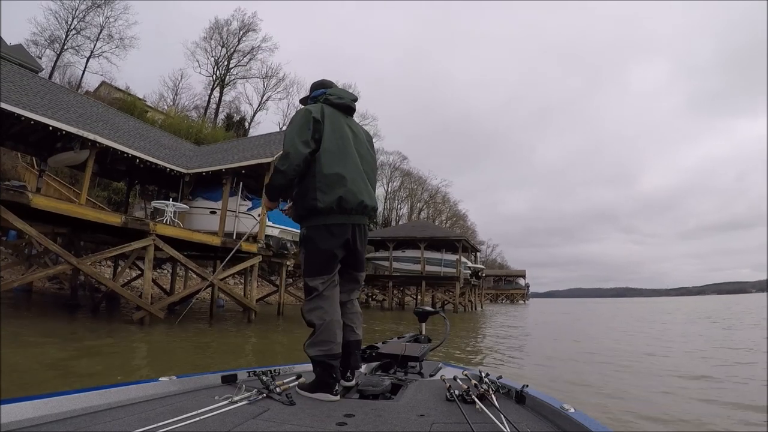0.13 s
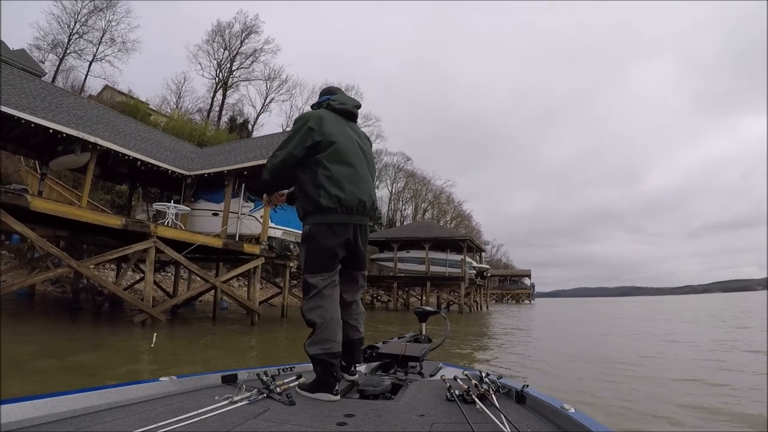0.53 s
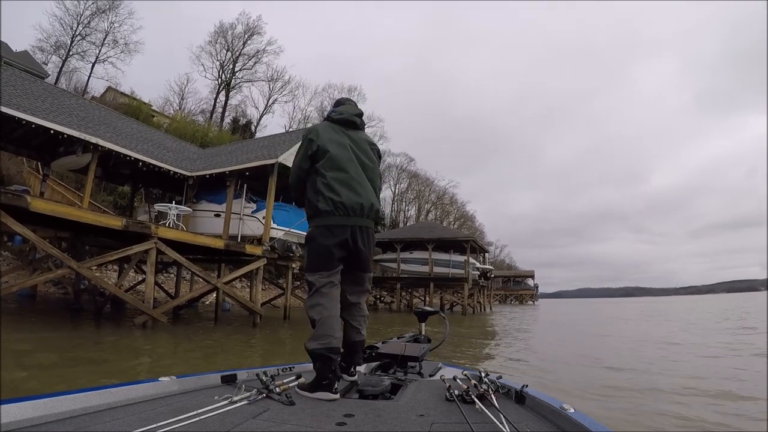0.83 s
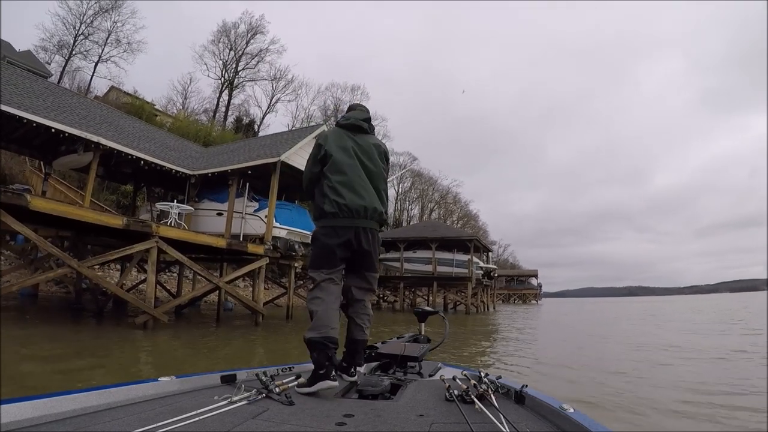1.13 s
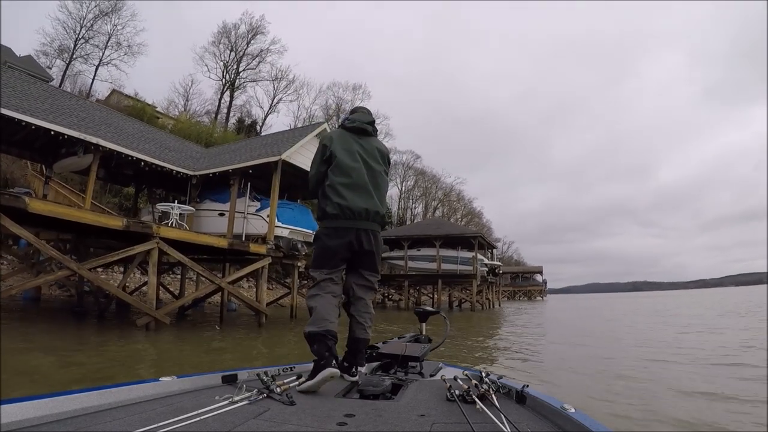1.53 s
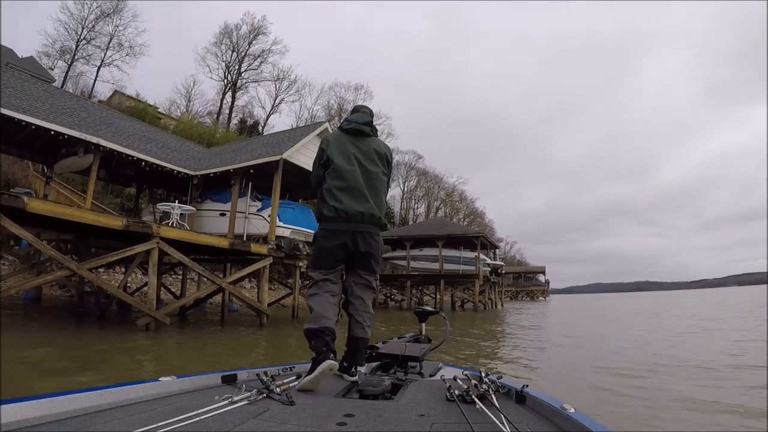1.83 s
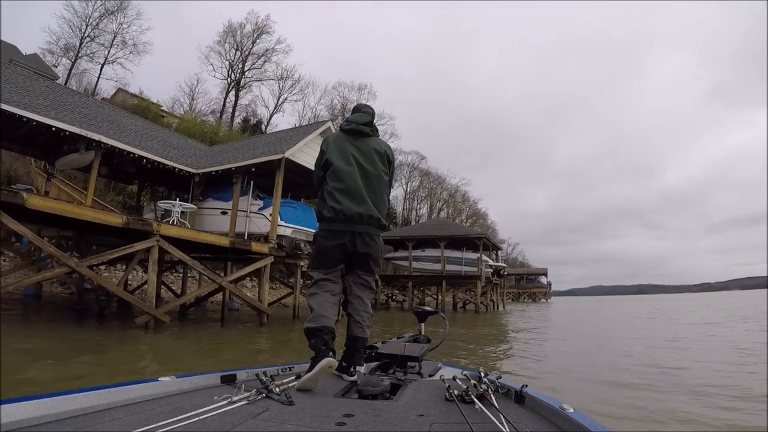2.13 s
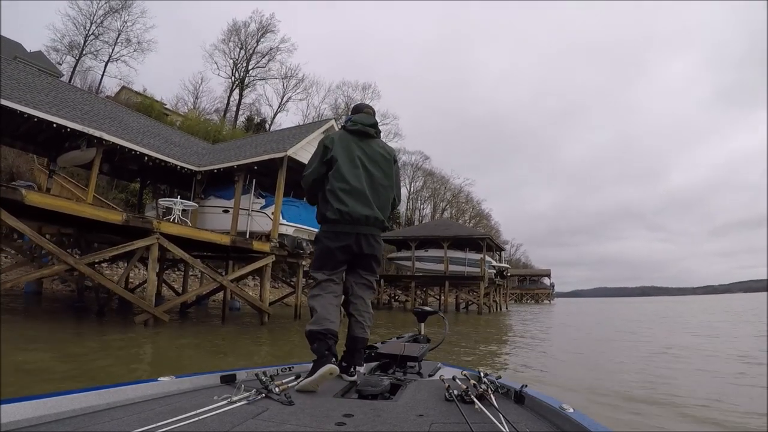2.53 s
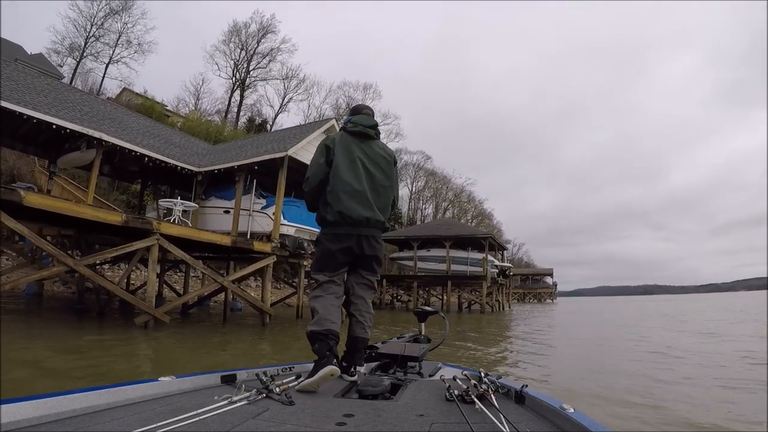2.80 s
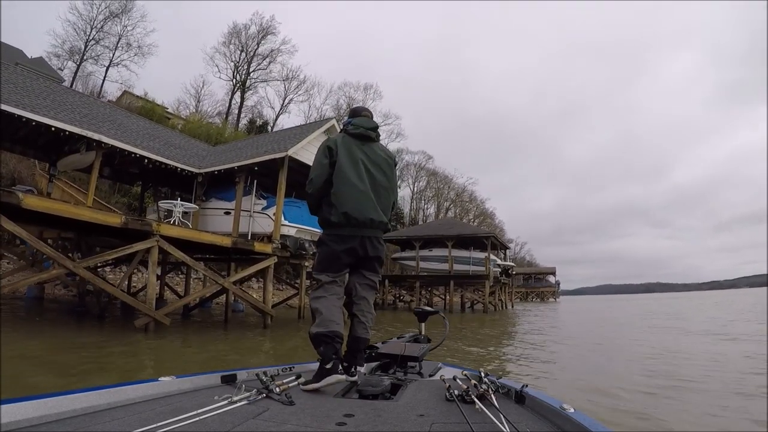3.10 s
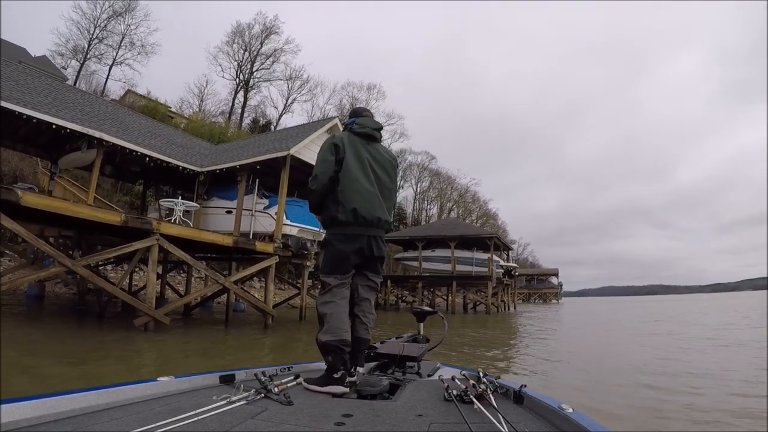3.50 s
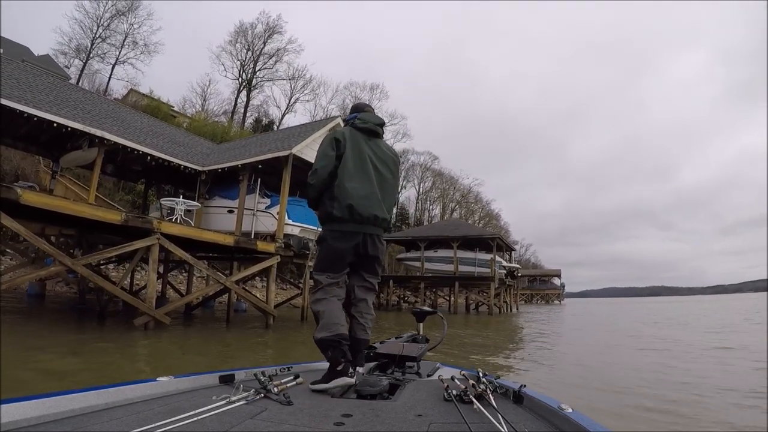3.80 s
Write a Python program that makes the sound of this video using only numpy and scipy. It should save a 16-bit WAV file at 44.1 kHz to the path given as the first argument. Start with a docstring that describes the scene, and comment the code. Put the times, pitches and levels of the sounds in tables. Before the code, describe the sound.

Outdoors on a fishing boat, waves knock and gurgle under the hull, moderate at first, then two heavy slaps near the end; low wind buffets the deck-mounted stereo microphone, with small clicks and distant bird calls.

```python
"""Choppy lake water slaps the hull of a small fishing boat: each wave is noise for the splash, fading tones
for the hollow boom and rising tones for trapped air. The boom shakes the deck camera, so its two microphones
swing in opposition. Tackle clicks (ringing noise), drops plink and far birds call (blurred tones).
Wind buffets the microphones over a soft hiss (shaped noise), and the biggest slaps push the camera's gain down."""
import sys
import numpy as np
from scipy.fft import rfft, irfft, next_fast_len
from scipy.io import wavfile
from scipy.ndimage import uniform_filter1d, minimum_filter1d, map_coordinates

SR = 44100
rng = np.random.default_rng(int(sys.argv[2]) if len(sys.argv) > 2 else 0)


def generate_wav(signal):
    """Clip the signal to [-1, 1] and save it as 16-bit WAV at the path in sys.argv[1]."""
    frames = np.transpose(np.atleast_2d(signal))
    scaled = np.clip(frames, -1, 1) * 32767
    pcm = np.round(scaled).astype(np.int16)
    wavfile.write(sys.argv[1], SR, pcm)


N = 174195  # length in samples


def amp(db):
    """Turn decibels into gain."""
    return 10 ** (np.asarray(db) / 20)


def unit(x):
    """Scale to rms 1."""
    return x / np.sqrt(np.mean(x ** 2) + 1e-20)


def along(points, hz):
    """Read a curve of (pitch_hz, value) points on a log pitch axis."""
    f, v = np.transpose(points)
    return np.interp(np.log(hz + 1), np.log(f + 1), v)


def curve(rows):
    """Join (time_s, value) points into one value per sample."""
    return np.interp(np.arange(N) / SR, *np.transpose(rows))


def wobble(rate, size=N):
    """Draw a smooth random curve with rate knots a second."""
    return map_coordinates(rng.standard_normal(2048), [np.arange(size) * rate / SR], mode="wrap")


def filtered(x, response):
    """Filter x by a gain that depends on frequency."""
    n = x.shape[-1]
    m = next_fast_len(n + SR // 4)
    spectrum = rfft(x, m) * response(np.fft.rfftfreq(m, 1 / SR))
    return irfft(spectrum, m)[..., :n]


def rush(gain, alike, size=N):
    """Make stereo noise of rms 1 with a given colour and left-right likeness."""
    def mid_side(hz):
        turn = np.arccos(np.clip(along(alike, hz), -.98, .98)) / 2
        return gain(hz) * np.array([np.cos(turn), np.sin(turn)])

    mid, side = filtered(rng.standard_normal((2, size)), mid_side)
    return unit(np.array([mid + side, mid - side]))


def colour(points):
    """Turn (pitch_hz, level_db) points into a gain of frequency."""
    return lambda hz: amp(along(points, hz))


def hump(hz, centre, slope_db):
    """A rounded peak whose skirts fall by slope_db an octave."""
    return amp(-slope_db * np.hypot(np.log2((hz + 1) / centre), .5))


def add(out, s, x):
    """Mix x into out at time s."""
    i = int(np.clip(round(s * SR), 0, N - 1))
    out[..., i:i + x.shape[-1]] += x[..., :N - i]


def add_wash(out, s, db, rise, fall, gain, alike, grain_db):
    """Mix in grainy noise that swells to a rounded crest near s and dies away."""
    t = np.arange(-.1, .25, 1 / SR)
    level = 2 * amp(db) * np.exp(-np.logaddexp(-t / rise, t / fall))
    grain = unit(amp(grain_db * wobble(400.4, size=len(t))))
    add(out, s + t[0], level * grain * rush(gain, alike, size=len(t)))


def bubble(hz, life, rise):
    """A damped tone that rises as the bubble nears the surface."""
    u = np.arange(int(1.4 * life * SR)) / SR / life
    tone = np.sin(2 * np.pi * hz * life * (u + rise * u ** 2 / 2))
    return tone * (1 - np.exp(-12 * u)) * amp(7.0 - 46.7 * u)


# strength of the gusts, before the overall lift: time_s, level_db
GUSTS = [(0.0, -27.5), (0.76, -25), (0.8, -32), (1.29, -25), (1.34, -28.5), (1.46, -18.5), (1.58, -23),
         (1.68, -20), (1.74, -26), (2.16, -25.5), (2.22, -28), (2.54, -17.5), (2.6, -26), (2.67, -24),
         (2.77, -26.5), (3.57, -24), (3.83, -20), (3.95, -19.5)]
# colour of the rumble: pitch_hz, level_db
RUMBLE_COLOUR = [(8, 6), (25, 3), (50, 0), (85, 1.5), (120, -8), (180, -20), (300, -28), (600, -77),
                 (2000, -96)]
# how alike the rumble is left and right: pitch_hz, likeness (1 = same)
RUMBLE_LIKENESS = [(30, 0.86), (100, 0.42), (400, 0.12)]
WIND_LIFT_DB, WIND_FLUTTER_DB = 3.5, 0.4


def wind():
    """Gusts press on the microphones and make a low, fluttering rumble."""
    level_db = WIND_LIFT_DB + curve(GUSTS) + WIND_FLUTTER_DB * wobble(14)
    return amp(level_db) * rush(colour(RUMBLE_COLOUR), RUMBLE_LIKENESS)


# slow rise and fall of the wash, before its random flutter: time_s, level_db
WASH_LEVEL = [(0, -49), (.55, -49), (1.1, -47), (1.5, -46), (2.1, -48.5), (2.6, -46), (2.85, -44),
              (3.15, -47.5), (3.45, -46.5), (3.7, -48.5), (3.95, -45)]
# colour of the wash: pitch_hz, level_db
WASH_COLOUR = [(240, 2), (400, 7), (509, 0), (679, 2.5), (1100, -0.5), (1300, -1.5), (1660, -2.5),
               (2350, -4), (2900, -11.5), (3580, -8), (4500, -12), (7520, -10), (10800, -20.5),
               (13400, -35), (14800, -30)]
# how the high hiss comes and goes, before its random flutter: time_s, level_db
HISS_LEVEL = [(0, -58.5), (.36, -52), (.7, -56), (1.18, -63.5), (1.36, -47), (1.6, -60), (2.2, -59),
              (2.6, -66), (3, -61.5), (3.95, -65)]
# colour of the high hiss: pitch_hz, level_db
HISS_COLOUR = [(1000, 8), (3500, -1.5), (7000, 2.5), (10000, -5.5), (13500, -13), (15000, -43)]
# how alike left and right are, also for the tackle's clicks: pitch_hz, likeness (1 = same)
AIR_LIKENESS = [(400, 0.019), (1200, 0.043), (2200, 0.17), (3800, 0.72), (5200, 0.039), (8000, 0.033),
                (12000, 0.12)]
# balance of wash and hiss: pitch_hz, left_over_right_db
LEFT_OVER_RIGHT = [(400, -0.5), (2500, 0.5), (4000, 0.5), (6000, 5), (8300, -6), (10500, -6), (13000, 1)]


def air():
    """Breeze and open water make a broad wash, with a high hiss that comes and goes."""
    wash_gain = amp(curve(WASH_LEVEL) + 1.9 * wobble(6.71))
    wash = wash_gain * rush(colour(WASH_COLOUR), AIR_LIKENESS)
    hiss_gain = amp(curve(HISS_LEVEL) + 1.2 * wobble(24.5))
    hiss = hiss_gain * rush(colour(HISS_COLOUR), AIR_LIKENESS)
    return filtered(wash + hiss, lambda hz: amp(np.outer([.5, -.5], along(LEFT_OVER_RIGHT, hz))))


RIPPLES_PER_S, RIPPLE_MIDDLE_HZ, RIPPLE_MIDDLE_DB = 150, 1240, -66.5
RIPPLE_CYCLES = 3.7  # life of each bubble, in cycles of its tone


def ripples():
    """Many tiny bubbles along the waterline ring briefly at random moments, pitches and sides."""
    out = np.zeros((2, N))
    count = int(RIPPLES_PER_S * N / SR)
    for s, (pitch, size, pan) in zip(rng.uniform(0, N / SR, count), rng.standard_normal((count, 3))):
        hz = RIPPLE_MIDDLE_HZ * np.exp(.5 * pitch)
        level_db = RIPPLE_MIDDLE_DB + 2.4 * size + np.array([[2], [-2]]) * pan
        add(out, s, amp(level_db) * bubble(hz, RIPPLE_CYCLES / hz, 0.2))
    return out


# spray pattering back on the water: peak_s, rise_s, fall_s, centre_hz, level_db
PATTERS = [(0.124, 0.0061, 0.0051, 1700, -52), (0.539, 0.0034, 0.021, 1050, -49),
           (0.655, 0.0047, 0.011, 1120, -41), (1.37, .025, 0.017, 10000, -59),
           (2.195, 0.013, 0.0086, 1790, -52), (2.404, .008, 0.021, 1150, -46.5),
           (2.495, 0.022, 0.016, 2090, -54.5), (3.17, 0.043, 0.019, 2900, -48.5),
           (3.395, 0.0084, 0.01, 1960, -39.5), (3.70, 0.011, 0.013, 2440, -49)]
# how alike the spray is left and right: pitch_hz, likeness (1 = same)
SPRAY_LIKENESS = [(700, 0.22), (2000, 0.23), (6000, .3)]
SPRAY_GRAIN_DB, SPRAY_SLOPE_DB = 5.5, 15.5  # slope: per octave away from the centre


def spray():
    """Fine drops patter back on the water as short bursts of grainy noise."""
    out = np.zeros((2, N))
    for s, rise, fall, centre, db in PATTERS:
        tone = lambda hz: hump(hz, centre, SPRAY_SLOPE_DB)
        add_wash(out, s, db, rise, fall, tone, SPRAY_LIKENESS, SPRAY_GRAIN_DB)
    return out


# waves on the hull, shared by hull, air pockets, splashes and froth (levels are relative within each):
# start_s, boom_db, hollow_knock_db, splash_db, splash_rise_s, splash_fall_s, splash_centre_hz,
# trapped_air_hz, trapped_air_db
WAVES = [(0.136, -10, -21.5, -25, 0.0091, 0.027, 473, 405, -11.5),
         (0.215, -43, -28, -30, 0.016, .02, 400, 350, -25),
         (.345, -23.5, -37, -43, 0.012, 0.017, 650, 277, -40),
         (.428, -11, -31, -33.5, 0.016, 0.021, 505, 226, -29),
         (.545, -52, -28, -37.5, 0.0077, 0.023, 735, 399, -27),
         (0.64, -18.5, -26, -32.5, 0.011, 0.028, 597, 327, -23),
         (0.675, -20, -30.5, -40, 0.0092, 0.017, 640, 248, -41),
         (1.161, -11, -20, -27, .002, 0.026, 530, 488, -16.5),
         (1.204, -22.5, -23, -40, 0.0098, 0.039, 427, 274, -24),
         (1.38, -18.5, -24, -27.5, 0.017, .017, 470, 428, -25.5),
         (1.512, -14.5, -30, -40.5, 0.046, 0.024, 500, 212, -13),
         (1.595, -22, -39, -44, .02, 0.067, 450, 186, -30),
         (1.856, -44, -37, -35.5, 0.0042, 0.049, 480, 440, -23.5),
         (2.072, -19, -18, -24.5, 0.015, 0.021, 402, 301.6, -9.5),
         (2.13, -32, -32, -36, 0.0069, .026, 403, 350, -29.5),
         (2.21, -26, -33.5, -35.5, 0.014, 0.013, 820, 300, -38),
         (2.408, -16.5, -22, -29.5, 0.016, 0.028, 700, 376, -25.5),
         (2.444, -34, -39, -38, 0.009, 0.012, 523, 238, -17),
         (2.502, -31, -19, -23.5, 0.0052, .028, 340, 300.3, -8.5),
         (2.691, -49, -34, -39, 0.012, .02, 420, 397, -35),
         (2.737, -26, -22.5, -42, 0.0055, 0.0098, 400, 294, -18),
         (2.763, -4, -4.5, -15, 0.0045, .028, 380, 251.6, -4),
         (2.824, -15.5, -46, -40, .01, .02, 450, 204, -37),
         (2.905, -24.5, -33, -50, .01, 0.024, 450, 300, -42),
         (3.106, -20, -24, -39, 0.021, 0.042, 450, 235, -18.5),
         (3.241, -17, -35, -39, 0.014, .022, 453, 437, -32),
         (3.392, -1, -4, -7.5, 0.0052, 0.013, 370, 307, 0),
         (3.472, -10.5, -23.5, -52, 0.011, 0.018, 350, 198, -26),
         (3.624, -24, -32, -46, 0.0073, .015, 350, 250, -22.5),
         (3.72, -24.5, -30, -40, 0.03, 0.048, 700, 480, -40),
         (3.87, -38, -31, -44, .01, .02, 450, 228, -25)]
# ringing modes of the hull: pitch_hz, level_db, t60_s (time to fade by 60 dB), left_over_right_db
HULL_MODES = [(88.5, -18.5, 0.66, -6.5), (119.2, 5, 0.28, -9), (133.1, 7, 0.28, -8.5),
              (209, -3.5, 0.34, -8.5), (239.3, -6, 0.29, -9), (276.6, -2, 0.28, -3.5), (292, -10, 0.6, -1),
              (310.1, -0.5, 0.18, -3), (387.3, -3.5, 0.12, -2), (455.7, -6, 0.13, -0.5),
              (547, -15, 0.051, -3.5), (697, -13.5, 0.082, -8.5)]
BOOM_BELOW_HZ = 170  # modes below this follow the boom level, the others the knock level
SWELL_S, HOLD_S = 0.019, 0.0059  # time to swell; the push of a wave lasts a moment before the fade
LAG_CYCLES = 0.93  # a mode answers this many cycles late, so the low ones answer last
HULL_TURN = 0.19  # the microphones miss exact opposition (radians)
MODE_DRIFT = .45  # slow random phase drift (radians)
MODE_SHIFT = 0.017  # the wetted area, and so each mode's pitch, differs from wave to wave (share)


def hull():
    """Each wave swells into the hull's modes, from the top down; the microphones hear them nearly opposed."""
    out, t = np.zeros((2, N)), np.arange(int(.6 * SR)) / SR
    turn = np.array([[np.pi + HULL_TURN], [0]])
    for k, (hz, db, t60, pan_db) in enumerate(HULL_MODES):
        age = np.maximum(t - LAG_CYCLES / hz, 0)
        swell = np.sin(np.pi / 2 * np.minimum(age / SWELL_S, 1)) ** 2
        shape = swell * amp(db - 60 * np.maximum(age - HOLD_S, 0) / t60)
        drift = MODE_DRIFT * wobble(hz / 6, size=2 * N)
        ring = np.zeros((2, N))
        for s, boom_db, knock_db, *_ in WAVES:
            wave_hz = hz * (1 + MODE_SHIFT * rng.standard_normal())
            phase = 2 * np.pi * wave_hz * age + drift[int(s * SR):][:len(t)]
            level_db = boom_db if hz < BOOM_BELOW_HZ else knock_db
            add(ring, s, amp(level_db) * shape * np.sin(phase + turn))
        sign = (-1) ** k if hz > BOOM_BELOW_HZ else 1  # higher modes alternate in sign
        out += sign * unit(amp([[pan_db / 2], [-pan_db / 2]])) * ring
    return out


POCKET_DELAY_S, POCKET_LIFE_S = 0.0052, 0.086
POCKET_RISE, POCKET_ROUGH = 0.1, .25  # rise in pitch over the life, depth of the roughness (shares)
POCKET_SIDE_DB = -0.95  # added on the left, taken off on the right


def air_pockets():
    """Air trapped under each wave gives a short, rough, hollow clop, carried to the camera by the deck."""
    out = np.zeros(N)
    for s, *_, hz, db in WAVES:
        tone = bubble(hz, POCKET_LIFE_S, POCKET_RISE)
        rough = 1 + POCKET_ROUGH * wobble(hz / 2, size=len(tone))
        add(out, s + POCKET_DELAY_S, amp(db) * tone * rough)
    opposed = np.array([[-1], [1]])
    return amp([[POCKET_SIDE_DB], [-POCKET_SIDE_DB]]) * opposed * out


# shared colour of the splashes: pitch_hz, level_db
SPLASH_COLOUR = [(100, -9), (200, -6), (310, 12), (410, 4.5), (540, -1.5), (710, 4.5), (1050, -3.5),
                 (1800, -7), (8000, -9), (15000, -35)]
# how alike the splashes are left and right: pitch_hz, likeness (-1 = opposed, 1 = same)
SPLASH_LIKENESS = [(400, -0.95), (750, -0.94), (1300, -0.78), (2200, -0.41), (6000, .6)]
SPLASH_LIFT_DB, SPLASH_GRAIN_DB = -1.5, 1.5
SPLASH_PEAK_S = 0.008  # a splash crests about this long after its slap
SPLASH_SLOPE_DB = 21.5  # per octave away from the centre


def splashes():
    """Each wave climbs the hull and drains off; broad waves sound lower than small crests."""
    out = np.zeros((2, N))
    for s, _, _, db, rise, fall, centre, *_ in WAVES:
        tone = lambda hz: colour(SPLASH_COLOUR)(hz) * hump(hz, centre, SPLASH_SLOPE_DB)
        level_db = SPLASH_LIFT_DB + db
        add_wash(out, s + SPLASH_PEAK_S, level_db, rise, fall, tone, SPLASH_LIKENESS, SPLASH_GRAIN_DB)
    return out


FROTH_MIDDLE_HZ, FROTH_SPREAD = 712, 0.308  # spread: of the natural log of pitch
FROTH_DB = -19.5  # relative to the wave's splash level
FROTH_CYCLES = 9.5  # life of each bubble, in cycles of its tone


def froth(count=14):
    """Each wave folds in a cluster of bubbles; the larger ones are louder and also shake the deck."""
    out = np.zeros((2, N))
    for s, _, _, db, _, fall, *_ in WAVES:
        for when, pitch, size in rng.standard_normal((count, 3)):
            hz = FROTH_MIDDLE_HZ * np.exp(FROTH_SPREAD * pitch)
            # low bubbles reach the right microphone upside down
            right = np.clip(np.log2(hz / FROTH_MIDDLE_HZ) * 2, -1, 1)
            gain = amp(db + FROTH_DB + 2 * size) * min(FROTH_MIDDLE_HZ / hz, 1) ** 1.64
            tone = bubble(hz, FROTH_CYCLES / hz, 0.17)
            add(out, s + SPLASH_PEAK_S / 2 + fall * abs(when), gain * np.array([[1], [right]]) * tone)
    return out


# faint chirps of far birds (levels before a lift on each side): start_s, length_s, pitch_hz, level_db
BIRD_CHIRPS = [(.28, 0.095, 3900, -61), (.26, 0.079, 6600, -64), (1.8, 0.12, 3550, -63.5),
               (2.07, 0.058, 3850, -61.5)]
CHIRP_BLUR_RATE = 950  # random knots a second; more makes a wider, rougher pitch


def chirps():
    """Far birds give rough chirps: tones blurred by distance into narrow noise."""
    out = np.zeros((2, N))
    for s, length, hz, db in BIRD_CHIRPS:
        n = int(length * SR)
        phase = 2 * np.pi * hz * np.arange(n) / SR
        tone = wobble(CHIRP_BLUR_RATE, size=n) * np.sin(phase)
        tone += wobble(CHIRP_BLUR_RATE, size=n) * np.cos(phase)
        add(out, s, amp([[db + 9.0], [db + 7.5]]) * np.sin(np.linspace(0, np.pi, n)) * tone)
    return out


# single bubbles and drops (level before the tone's own shape):
# start_s, pitch_hz, level_db, life_s, pitch_rise (share over the life)
DROPS = [(0.541, 1034, -39.5, 0.028, 0.068), (0.913, 1203, -34, 0.026, 0.11),
         (2.19, 1720, -45, 0.038, 0.097), (2.225, 1206, -40, 0.02, 0.081), (2.42, 715, -40, 0.051, 0.033),
         (0.653, 1460, -40, .014, 0.077), (2.717, 1440, -38.5, 0.034, .1), (3.079, 4110, -37.5, 0.015, .03),
         (3.318, 4200, -33, 0.0076, .08)]
DROP_RIGHT_DB, DROP_ROUGH = -8.5, 1  # right relative to left; depth of the roughness (share)


def plinks():
    """Single drops and bubbles ring with a rough tone that rises and dies."""
    out = np.zeros((2, N))
    for s, hz, db, life, rise in DROPS:
        tone = bubble(hz, life, rise)
        rough = 1 + DROP_ROUGH * wobble(hz / 4, size=len(tone))
        add(out, s, amp([[db], [db + DROP_RIGHT_DB]]) * tone * rough)
    return out


# clicks of the tackle, with the dull knock under each: start_s, click_db, knock_db, attack_s
TACKLE_CLICKS = [(0.828, -34, -38.5, 0.00066), (1.061, -45.5, -44, 0.00047), (1.731, -43, -61, 0.002),
                 (1.8593, -36.5, -19, 0.00062), (2.713, -43, -50, 0.002), (2.725, -28.5, -36.5, 0.0054),
                 (2.762, -43, -39, 0.0011), (3.22, -43, -65, 0.0011), (3.265, -49, -70, 0.0011)]
# resonances of the tackle: pitch_hz, width_hz, level_db
TACKLE_RESONANCES = [(2160, 700, -2.5), (2870, 116, 11), (3440, 1300, -5), (4650, 300, 0),
                     (5030, 590, -0.5), (6370, 850, 1), (8000, 890, -2.5), (11800, 2600, -28)]
# colour of the dull knock: pitch_hz, level_db
KNOCK_COLOUR = [(150, -28), (450, -23), (700, 8), (1100, 2.5), (1400, -14), (1740, -4), (2200, -24),
                (3900, -8.5), (6000, -42), (15000, -71)]
CLICK_T60_S, KNOCK_T60_S = 0.042, 0.022  # time to fade by 60 dB
TAIL_DB, TAIL_T60_S = -28.5, 0.28  # faint longer tail under both


def tackle_body(f):
    """Add up the tackle's resonances, every other one flipped in sign."""
    total = 0
    for k, (centre, width, db) in enumerate(TACKLE_RESONANCES):
        peak = 1j * f * width / (centre * centre - f * f + 1j * f * width)
        total = total + (-1) ** k * amp(db) * peak
    return total


def tackle():
    """Short bright clicks of noise ring through the tackle, some with a dull knock on the deck."""
    t, bright, dull = np.arange(SR // 4) / SR, np.zeros(N), np.zeros(N)
    for s, click_db, knock_db, attack in TACKLE_CLICKS:
        age = np.maximum(t - attack, 0)
        rise = np.minimum(t / attack, 1)
        tail = amp(TAIL_DB - 60 * age / TAIL_T60_S)
        add(bright, s, amp(click_db) * rise * (amp(-60 * age / CLICK_T60_S) + tail))
        add(dull, s, amp(knock_db) * rise * (amp(-60 * age / KNOCK_T60_S) + tail))
    knock_likeness = [(400, -0.089), (1000, 0.026), (4000, 0.85)]  # pitch_hz, likeness
    clicks = bright * rush(tackle_body, AIR_LIKENESS)
    return clicks + dull * rush(colour(KNOCK_COLOUR), knock_likeness)


# when one far bird repeats its whistle: start_s
WHISTLE_STARTS = [2.86, 3.18, 3.49, 3.76]
WHISTLE_HZ, WHISTLE_FALL_HZ, WHISTLE_LENGTH_S = 2200, 422, 0.115
WHISTLE_RIGHT_DB, WHISTLE_BLUR = -56, 0.82  # blur: phase scatter (radians)


def whistle():
    """One far bird repeats a falling whistle, blurred by distance."""
    out = np.zeros((2, N))
    u = np.linspace(0, 1, int(WHISTLE_LENGTH_S * SR))
    for s in WHISTLE_STARTS:
        phase = 2 * np.pi * np.cumsum(WHISTLE_HZ - WHISTLE_FALL_HZ * u) / SR
        phase += WHISTLE_BLUR * wobble(136, size=len(u))
        add(out, s, amp([[WHISTLE_RIGHT_DB + 3], [WHISTLE_RIGHT_DB]]) * np.sin(np.pi * u) * np.sin(phase))
    return out


# shrinking air pockets (level before the fade): start_s, length_s, start_hz, end_hz, level_db
SHRINKING_POCKETS = [(3.361, 0.057, 581, 654, -27), (3.386, 0.05, 756, 1400, -26.5),
                     (3.69, 0.058, 2410, 3230, -48), (3.728, 0.067, 707, 1020, -52)]
GULP_FADE_DB, GULP_ROUGH, GULP_BLUR = 9, .25, 0.75  # roughness (share), blur: phase scatter (radians)


def gulps():
    """The pitch of an air pocket sweeps up ever faster and fades as it shrinks."""
    out = np.zeros((2, N))
    for s, length, start_hz, end_hz, db in SHRINKING_POCKETS:
        u = np.linspace(0, 1, int(length * SR))
        hz = start_hz + (end_hz - start_hz) * u ** 1.48
        rough = 1 + GULP_ROUGH * wobble(230, size=len(u))
        level = amp(-GULP_FADE_DB * u) * np.sin(np.pi * u) * rough
        phase = 2 * np.pi * np.cumsum(hz) / SR + GULP_BLUR * wobble(300, size=len(u))
        add(out, s, amp([[db], [db - 4.5]]) * level * np.sin(phase))
    return out


def scene():
    """Water, tackle, birds and wind at the deck camera."""
    waves = hull() + air_pockets() + splashes() + froth()
    small_water = ripples() + spray() + plinks() + gulps()
    return wind() + air() + waves + small_water + chirps() + whistle() + tackle()


DUCK_ABOVE_DB, DUCK_SHARE = -11, 0.58  # dB taken off for each dB above the threshold
RECOVER_DB_PER_S = 3
CEILING, TOP_HZ = .92, 14500  # highest peak let through by the limiter; pitch where the top is cut off


def record(dry):
    """Gain control ducks after loud slaps and creeps back; a limiter catches the peaks; the top is cut off."""
    power = np.abs(uniform_filter1d(np.mean(dry ** 2, axis=0), size=1024))
    level_db = 10 * np.log10(power + 1e-12)
    creep_db = RECOVER_DB_PER_S * np.arange(N) / SR
    push_db = DUCK_SHARE * np.maximum(level_db - DUCK_ABOVE_DB, 0)
    # the strongest push so far holds the gain down, less what has crept back since
    held_db = np.maximum.accumulate(push_db + creep_db) - creep_db
    ducked = dry * amp(-held_db)
    need = CEILING / np.maximum(np.abs(ducked).max(axis=0), CEILING)
    gain = uniform_filter1d(minimum_filter1d(need, size=401), size=401)
    return filtered(ducked * gain, lambda hz: hz < TOP_HZ)


dry = scene()
out = record(dry)
generate_wav(out)
```